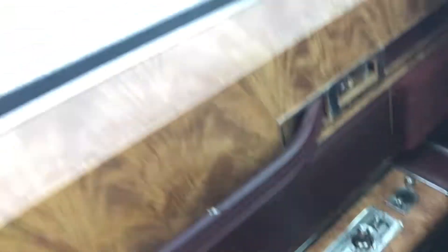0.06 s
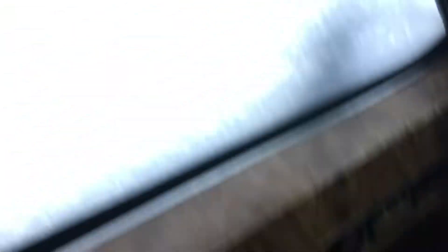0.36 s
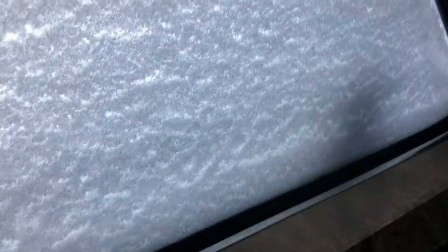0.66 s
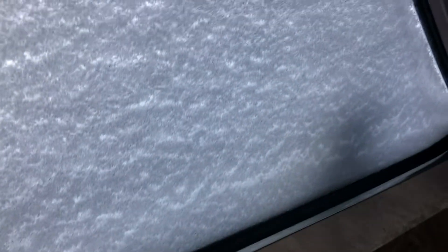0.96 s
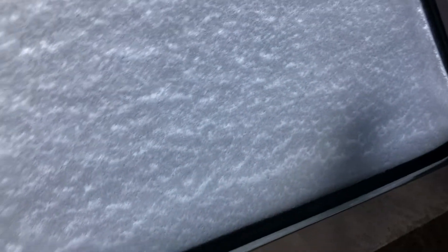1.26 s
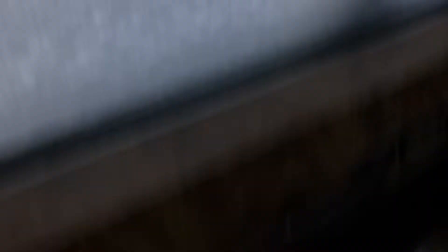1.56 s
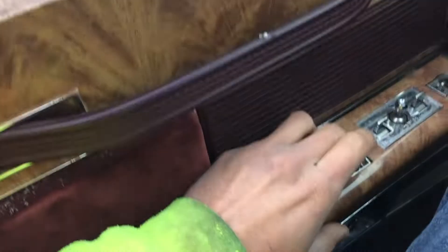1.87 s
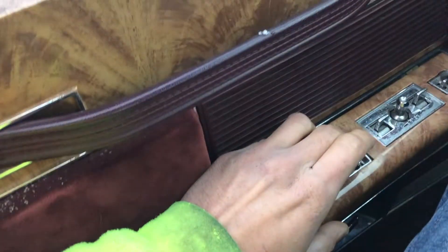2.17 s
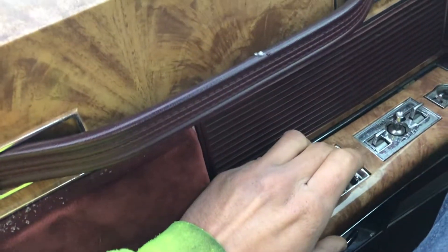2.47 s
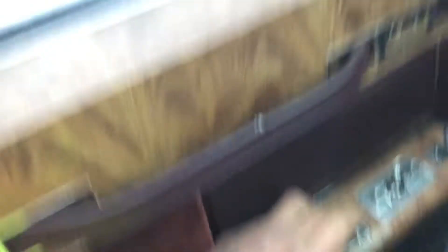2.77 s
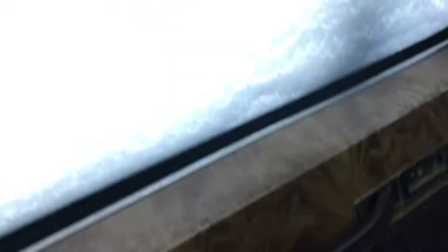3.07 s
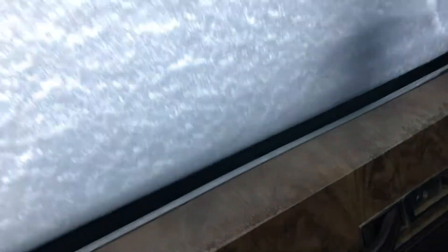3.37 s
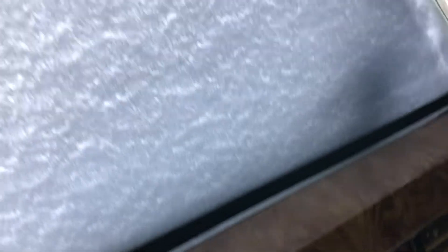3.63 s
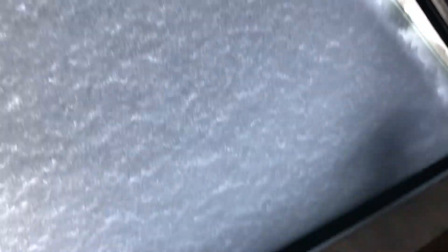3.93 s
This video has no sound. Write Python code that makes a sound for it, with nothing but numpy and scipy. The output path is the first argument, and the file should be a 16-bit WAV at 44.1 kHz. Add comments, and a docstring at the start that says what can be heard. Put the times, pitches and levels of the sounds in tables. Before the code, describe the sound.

A car's power window whines and scrapes in two short bursts over the idling engine.

```python
"""A power window runs in two short bursts inside a parked car on a frosty day: the motor's gears whine,
the glass scrapes through its icy seal by stick-slip friction, and jolts ring the door's low modes.
The door switch clicks lightly and a jacket sleeve swishes. Underneath, the engine idles with a
slowly swelling firing hum and a soft tick of the valve gear on every turn."""
import sys
import numpy as np
from scipy import signal
from scipy.fft import rfft, irfft
from scipy.io import wavfile

SR = 44100
rng = np.random.default_rng(int(sys.argv[2]) if len(sys.argv) > 2 else 0)


def output_pcm(signal):
    """Save a mono or channel-first signal as 16-bit PCM at the path in sys.argv[1].

    Samples are clipped to [-1, 1] before scaling.
    """
    pcm = np.clip(np.atleast_2d(signal).T, -1, 1) * 32767
    wavfile.write(sys.argv[1], SR, np.round(pcm).astype(np.int16))


N = 176400
T = np.arange(N) / SR
CRANK_HZ, FIRST_TICK_S = 18.5, 0.00056


def from_db(db):
    """Amplitude ratio: a factor of ten for every 20 dB."""
    return 10 ** (np.asarray(db) / 20)


def unit_rms(x):
    """Normalisation to a mean power of 1."""
    return x / np.sqrt(np.mean(x ** 2) + 1e-20)


def envelope(points):
    """Amplitude envelope through (time [s], level [dB]) points, silent outside them."""
    times, db = np.transpose(points)
    return from_db(np.interp(T, times, db, left=-200, right=-200))


def colour(x, points, tilt_db=0):
    """Spectral shaping by (frequency [Hz], gain [dB]) points and a tilt per octave; rms 1."""
    hz, db = np.transpose(points)
    octave = np.log2(np.maximum(np.fft.rfftfreq(len(x), 1 / SR), 1))
    low_cut_db = 20 * np.minimum(octave - np.log2(hz[0]), 0)
    gain = from_db(np.interp(octave, np.log2(hz), db) + tilt_db * octave + low_cut_db)
    return unit_rms(irfft(rfft(x) * gain, len(x)))


def drift(rate_hz, step=40, settle=2000):
    """Random modulation: noise low-passed at rate_hz; rms 1."""
    pole = np.exp(-2 * np.pi * rate_hz * step / SR)
    noise = rng.standard_normal(N // step + settle + 2)
    slow = signal.lfilter([1], [1, -2 * pole, pole * pole], noise)[settle:]
    return np.interp(np.arange(N) / step, np.arange(len(slow)), unit_rms(slow))


def sine(hz):
    """Oscillator whose phase is the integral of its frequency; rms 1."""
    return np.sqrt(2) * np.sin(2 * np.pi * (np.cumsum(hz) / SR + rng.random()))


def ring(force, hz, t60):
    """Damped resonator: its impulse response is a decaying sine of height 1."""
    r, w = np.exp(-np.log(1000) / (t60 * SR)), 2 * np.pi * hz / SR
    return signal.lfilter([0, np.sin(w)], [1, -2 * r * np.cos(w), r * r], force + 1e-18)


def resonate(force, modes):
    """Superposition of driven modes (frequency [Hz], level [dB], t60 [s]); rms 1."""
    return unit_rms(sum(from_db(db) * unit_rms(ring(force, hz, t60)) for hz, db, t60 in modes))


def with_noise(x, share):
    """Uncorrelated signals add in power: x supplies the given share, white noise the rest."""
    return np.sqrt(share) * x + np.sqrt(1 - share) * rng.standard_normal(N)


def cyclic_noise(share):
    """Partly periodic noise: a share of the power repeats every engine cycle (two turns)."""
    cycle = rng.standard_normal(int(2 * SR / CRANK_HZ))
    return with_noise(np.resize(cycle, N), share)


def engine(firing_hz=74.5, surge_depth=0.45, surge_decay_s=0.12):
    """Periodic excitation: firing hum and steady tones over rumble and clatter that surges once a turn."""
    # swell of the firing hum: (time [s], level [dB])
    hum_swell = [(0, -40.5), (.14, -51), (.3, -39.5), (.65, -40.5), (.83, -48.5), (.95, -40), (1.26, -38),
                 (1.5, -48.5), (1.7, -39.5), (2.0, -37), (2.23, -48.5), (2.45, -34.5), (2.68, -38.5),
                 (2.88, -45.5), (3.11, -39), (3.45, -47), (3.75, -39.5), (4, -39.5)]
    # engine and belt tones: (frequency [Hz], level [dB])
    partials = [(124, -56), (130, -53), (146.5, -50.5), (222.8, -58), (260, -64), (484, -72), (888, -71.5),
                (1023, -70)]
    # spectra of the rumble and the clatter: (frequency [Hz], relative density [dB])
    rumble_spectrum = [(25, -33), (45, -6.5), (62, -4), (90, -5.5), (120, 3.5), (165, -4), (200, -9),
                       (280, -10.5), (400, -21), (700, -38), (1500, -60)]
    clatter_spectrum = [(200, -11), (400, 0.5), (620, 3.5), (760, -13), (870, 2.5), (1050, -4), (1230, -8),
                        (1430, -7.5), (2200, -14.5), (2700, -16.5), (4000, -23), (5900, -25), (7700, -31),
                        (9600, -35), (15500, -42)]
    hum = envelope(hum_swell) * sine(firing_hz + 0.32 * drift(1.12))
    tones = sum(from_db(db) * (1 + 0.31 * drift(14.5)) * sine(hz + 0.75 * drift(2.38))
                for hz, db in partials)
    since_tick = (T - FIRST_TICK_S) % (1 / CRANK_HZ)
    strength = 1 + 0.12 * drift(14)
    surge = unit_rms(1 + surge_depth * strength * np.exp(-since_tick / surge_decay_s))
    clatter = from_db(-60.5) * surge * colour(cyclic_noise(share=0.61), clatter_spectrum)
    rumble = from_db(-49) * colour(cyclic_noise(share=0.6), rumble_spectrum)
    return hum + tones + clatter + rumble


def valve_ticks(lead_s=0.002, decay_s=0.002):
    """Impact excitation: once a turn a short chatter, much the same each time, rings the valve gear."""
    # modes of the valve gear: (frequency [Hz], relative level [dB], t60 [s])
    valve_modes = [(922, 12.5, 0.017), (1412, 3, 0.061), (1649, -1, 0.062), (2620, -5, 0.034),
                   (2897, -6, 0.037), (4484, -11.5, 0.018), (5824, -11, 0.053), (7000, -17.5, 0.069),
                   (8700, -18, 0.031)]
    since_tick = (T - FIRST_TICK_S + lead_s) % (1 / CRANK_HZ)
    repeating = rng.standard_normal(N)[(since_tick * SR).astype(int)]
    chatter = with_noise(repeating, share=0.7)
    blows = chatter * since_tick * np.exp(-since_tick / decay_s) * (1 + 0.12 * drift(17))
    return from_db(-64.5) * resonate(blows, valve_modes)


def sleeve():
    """Sliding friction of cloth: broadband noise in which resonances add a faint squeak."""
    # course of the swish: (time [s], level [dB])
    swish_level = [(0, -64), (.1, -68), (.2, -72), (.32, -76.5), (.43, -72), (.6, -81), (.8, -98)]
    # spectrum of the swish: (frequency [Hz], relative density [dB])
    swish_spectrum = [(500, -8), (1500, 1), (3000, -13), (4000, 6.5), (5500, -2), (10000, -4), (15500, -11)]
    # squeak resonances: (frequency [Hz], relative level [dB], t60 [s])
    squeak_modes = [(2540, 5, 0.1), (2770, -1, 0.071), (3830, 2, 0.027), (4480, -2, 0.031), (6460, -3, .03),
                    (8600, -15, .03)]
    friction = rng.standard_normal(N)
    squeak = from_db(-4) * resonate(friction, squeak_modes)
    return envelope(swish_level) * unit_rms(colour(friction, swish_spectrum) + squeak)


def trim_rubs():
    """Friction of finger and cloth on the trim: noise swells and fades, driving one squeak resonance."""
    # (time [s], level [dB], rise [s], fall [s], squeak frequency [Hz], relative squeak level [dB])
    rubs = [(1.343, -55, .009, .007, 570, 4), (1.361, -56.5, 0.012, 0.012, 1600, -4),
            (2.313, -42, 0.01, 0.012, 1740, 7), (2.289, -52, 0.015, 0.016, 1700, 1),
            (3.064, -50.5, 0.01, .007, 1520, 4)]
    # spectrum of a rub: (frequency [Hz], relative density [dB])
    rub_spectrum = [(250, -5), (560, -1), (850, -10), (1600, -3), (2500, -5), (3500, -17), (15000, -38)]
    out = np.zeros(N)
    for peak_s, db, rise, fall, hz, squeak_db in rubs:
        friction = rng.standard_normal(N)
        swell = np.exp(-np.maximum((peak_s - T) / rise, (T - peak_s) / fall))
        squeak = from_db(squeak_db) * unit_rms(ring(friction, hz, t60=0.01))
        out += from_db(db) * swell * unit_rms(colour(friction, rub_spectrum) + squeak)
    return out


def clicks(attack_s=0.00022, size=8192):
    """Heavily damped impacts: each is a decaying noise burst with its own brightness and resonance."""
    # switch clicks, snaps of ice and knocks of the window gear:
    # (time [s], level [dB], tilt [dB/octave], t60 [s], ring frequency [Hz], relative ring level [dB])
    contacts = [(0.404, -48.5, -4, 0.014, 3300, -12), (.407, -50.5, -10, .025, 900, -3),
                (1.353, -55, -1, .03, 1000, -3), (1.9574, -54, 8, 0.024, 9100, -14),
                (2.1235, -64, 5, 0.016, 11000, -9), (2.286, -57, 9, 0.012, 11900, -7),
                (2.3102, -51, 7, .05, 6200, -7), (2.326, -57, 9, .025, 11500, -11),
                (2.3427, -35, -3, 0.05, 2900, -12), (2.349, -38, -8, .05, 800, 0),
                (2.3916, -37, 8, 0.025, 2700, -15), (2.3942, -38.5, 8, .02, 14500, -10),
                (2.447, -47.5, 0, 0.09, 1650, -15), (2.482, -47, 3, .025, 1700, -8),
                (2.4975, -45, 9, .02, 6000, -9), (2.5123, -38, 7, .015, 6300, -2),
                (2.515, -38, -6, 0.06, 1630, -5.5), (2.5312, -40, 10, 0.025, 2950, -1),
                (2.547, -42, 6, 0.035, 2630, 0), (2.5731, -45, 9, .03, 7500, -9),
                (2.7018, -50.5, 8.5, 0.018, 8800, -12), (2.714, -58.5, -1, 0.048, 5060, -4),
                (2.8848, -58.5, 6.5, 0.043, 6800, -8), (3.0949, -50, 5, 0.04, 2570, 2.5),
                (3.2878, -39, 0, .028, 4000, -2), (3.2892, -40.5, -2, .028, 1850, -2),
                (3.4241, -54, 10, 0.018, 14000, -8), (3.438, -55.5, 9.5, 0.022, 8650, -10)]
    # click spectrum before the tilt: (frequency [Hz], relative density [dB])
    click_spectrum = [(300, -19), (800, 26), (1800, 21.5), (2900, 9), (4200, 7), (5500, -6), (9000, -6.5),
                      (15500, -18)]
    out, t = np.zeros(N + size), np.arange(size) / SR
    for onset_s, db, tilt_db, t60, hz, ring_db in contacts:
        start, noise = int(onset_s * SR), rng.standard_normal(size)
        shape = np.minimum(t / attack_s, 1) * np.exp(-np.log(1000) * t / t60)
        ringing = from_db(ring_db) * unit_rms(ring(noise, hz, t60=0.004))
        out[start:start + size] += from_db(db) * shape * (colour(noise, click_spectrum, tilt_db) + ringing)
    return out[:N]


def door_thumps():
    """Modal response of the door to jolts of the window gear; a longer force pulse sounds duller."""
    # force pulses as the door takes the load: (time [s], impulse level [dB], duration [s])
    pulses = [(2.346, -37, 0.0006), (2.397, -30.5, 0.00042), (2.439, -27, 0.0039), (2.516, -28.5, 0.00079),
              (2.566, -22.5, 0.0075), (2.618, -26, 0.0085)]
    # modes of the door panel: (frequency [Hz], gain [dB], t60 [s])
    door_modes = [(83, -3.5, 0.15), (101, 1, 0.13), (155.6, -2, 0.091), (204, -7, 0.11), (296, -3.5, 0.067),
                  (343, 2.5, 0.065), (404, -4.5, 0.072), (611, -12, 0.12), (870, -20, 0.039)]
    force = np.zeros(N)
    for onset_s, db, duration in pulses:
        push = np.sin(np.pi * np.clip((T - onset_s) / duration, 0, 1)) ** 2
        force += from_db(db) * push / push.sum()
    return sum((-1) ** k * from_db(db) * ring(force, hz, t60) for k, (hz, db, t60) in enumerate(door_modes))


def glass_scrape(cracks_per_s=5000, slips_per_s=170, slip_decay_s=0.0012, slip_depth=0.8):
    """Stick-slip friction: frosty glass drags through the seal; hiss and tiny cracks ring the pane."""
    # friction in the seal, one curve per burst: (time [s], level [dB])
    drag_levels = [
        [(2.335, -49), (2.348, -53), (2.405, -56), (2.42, -64), (2.44, -85), (2.455, -56.5), (2.488, -71),
         (2.50, -44), (2.52, -44), (2.55, -46), (2.59, -49), (2.605, -58), (2.62, -81)],
        [(3.08, -66), (3.12, -61), (3.134, -51.5), (3.225, -47.5), (3.245, -53.5), (3.285, -50), (3.297, -45.5),
         (3.32, -52), (3.39, -54), (3.43, -58.5), (3.46, -71)],
    ]
    # spectrum of the scrape: (frequency [Hz], relative density [dB])
    scrape_spectrum = [(200, -6), (700, 1.5), (1400, -3), (2700, -1.5), (3100, -2.5), (3800, -2.5),
                       (4800, -5), (8000, -8), (11000, -9.5), (13000, -11.5), (15500, -11.5)]
    # modes of the pane and the door shell: (frequency [Hz], relative level [dB], t60 [s])
    pane_modes = [(865, 9, 0.095), (1650, 2, 0.013), (2110, 1, 0.033), (2800, -9, 0.017),
                  (2920, -10, 0.018), (3690, -6, 0.029), (4000, -23, 0.046), (6700, -9, 0.015)]
    crack_onsets = rng.random(N) < cracks_per_s / SR
    polarity = rng.choice([-1, 1], N)
    crack_db = 1.5 * np.minimum(rng.exponential(1, N), 5)
    rasp = with_noise(unit_rms(crack_onsets * polarity * from_db(crack_db)), share=0.35)
    slip_onsets = 1.0 * (rng.random(N) < slips_per_s / SR)
    slips = signal.lfilter([1], [1, -np.exp(-1 / (slip_decay_s * SR))], slip_onsets)
    rasp *= 1 + slip_depth * slips
    drag = sum(envelope(burst) for burst in drag_levels)
    flutter = from_db(0.7 * drift(45))
    pane = from_db(-12) * resonate(rasp, pane_modes)
    return drag * flutter * unit_rms(colour(rasp, scrape_spectrum) + pane)


def window_motor(meshes_per_turn=3, jitter=0.011, roughness=0.2, fade_in_s=0.0054, fade_out_s=0.031):
    """Gear meshing gives a harmonic whine and a rumble; rotor unbalance shakes as the speed squared."""
    # motor speed, one curve per burst: (time [s], mesh frequency [Hz])
    speeds = [
        [(2.33, 220), (2.352, 276.6), (2.405, 303), (2.44, 315.2), (2.49, 301.6), (2.53, 256.8), (2.61, 162)],
        [(3.085, 208), (3.122, 251.6), (3.184, 260), (3.238, 275), (3.30, 271), (3.362, 267.4), (3.39, 238),
         (3.44, 140)],
    ]
    # gear whine, one curve per burst: (time [s], level [dB])
    whine_levels = [
        [(2.33, -50.5), (2.61, -50.5)],
        [(3.085, -50), (3.102, -49), (3.122, -55), (3.16, -51), (3.19, -59), (3.235, -48), (3.36, -50),
         (3.44, -57)],
    ]
    # partials of the whine: (multiple of the mesh frequency, relative level [dB])
    harmonics = [(1, -12.5), (2, -9.5), (3, -5), (4, -7.5), (5, -17.5), (6, -42)]
    # gear rumble and rotor shake at top speed, one value per burst: (level [dB])
    rumble_levels = [-36, -45.5]
    shake_levels = [-44, -46]
    # spectrum of the gear rumble: (frequency [Hz], relative density [dB])
    rumble_spectrum = [(35, -14), (70, 7), (98, 2.5), (140, 0), (200, -7.5), (370, -10), (500, -19.5),
                       (850, -23.5), (1400, -25.5), (2500, -36.5), (6000, -60)]
    out = np.zeros(N)
    for speed, whine_level, rumble_db, shake_db in zip(speeds, whine_levels, rumble_levels, shake_levels):
        times, hz = np.transpose(speed)
        mesh_hz = np.interp(T, times, hz) * (1 + jitter * drift(41.7))
        running = np.clip((T - times[0]) / fade_in_s, 0, 1) * np.clip((times[-1] - T) / fade_out_s, 0, 1)
        whine = sum(from_db(db) * (1 + roughness * drift(26)) * sine(k * mesh_hz) for k, db in harmonics)
        shake = from_db(shake_db) * (mesh_hz / hz.max()) ** 2 * sine(mesh_hz / meshes_per_turn)
        rumble = from_db(rumble_db) * colour(rng.standard_normal(N), rumble_spectrum)
        out += running * (envelope(whine_level) * whine + shake + rumble)
    return out


def scene():
    """Superposition of direct sound: every source is close by in the padded, absorbent cabin."""
    background = engine() + valve_ticks() + sleeve() + trim_rubs()
    window = clicks() + door_thumps() + glass_scrape() + window_motor()
    return (background + window)[None]


def record(dry, cutoff_hz=15850):
    """Band limiting: a steep elliptic low-pass removes the highest treble."""
    return signal.sosfilt(signal.ellip(12, .1, 80, cutoff_hz, fs=SR, output="sos"), dry)


dry = scene()
out = record(dry)
output_pcm(out)
```